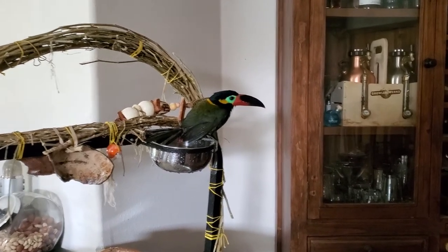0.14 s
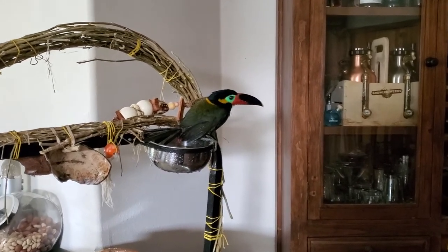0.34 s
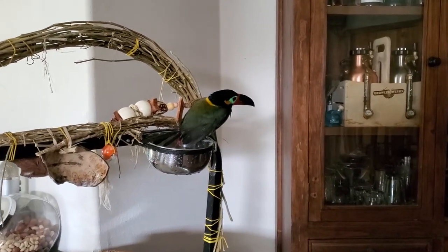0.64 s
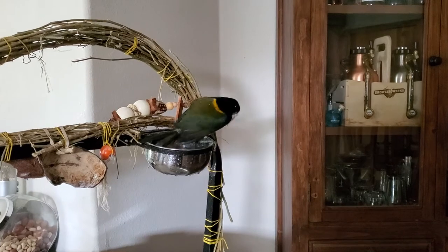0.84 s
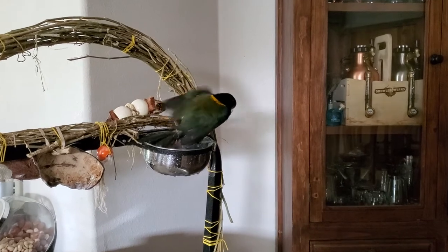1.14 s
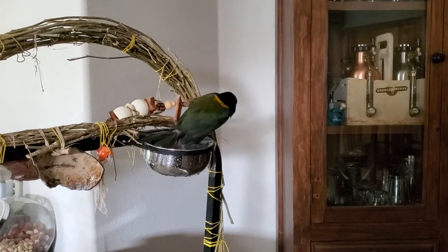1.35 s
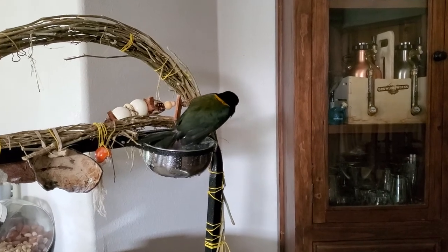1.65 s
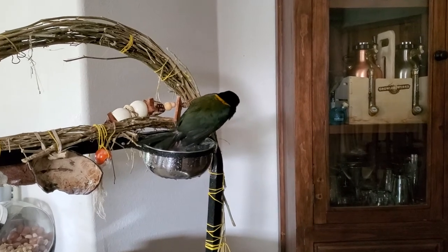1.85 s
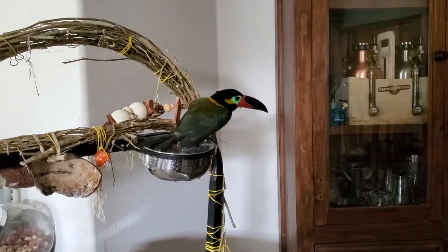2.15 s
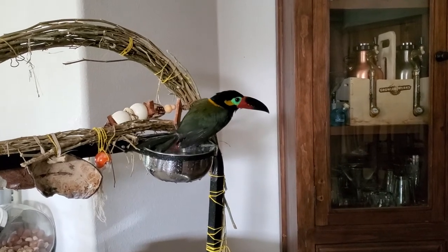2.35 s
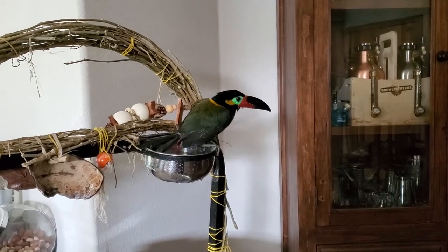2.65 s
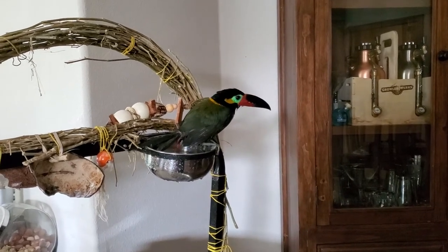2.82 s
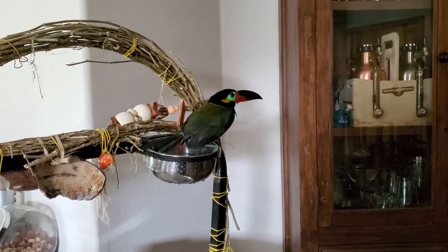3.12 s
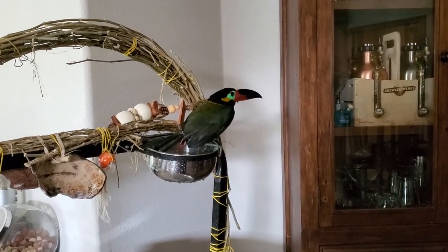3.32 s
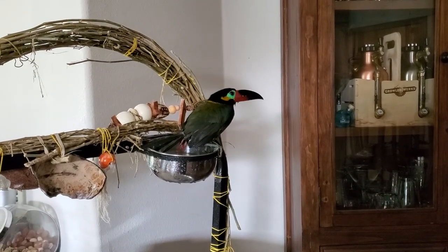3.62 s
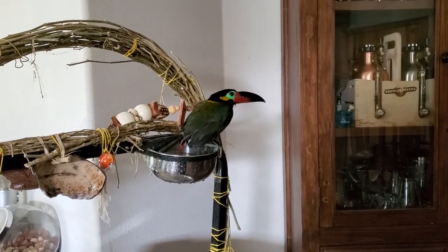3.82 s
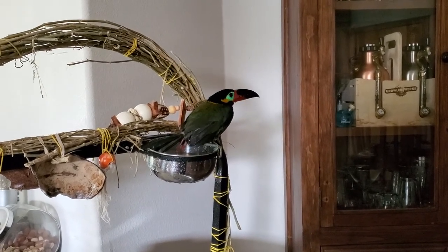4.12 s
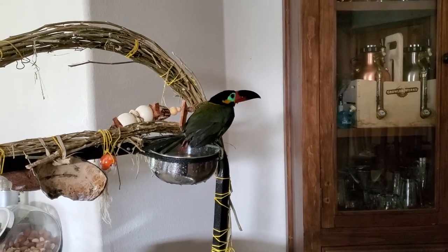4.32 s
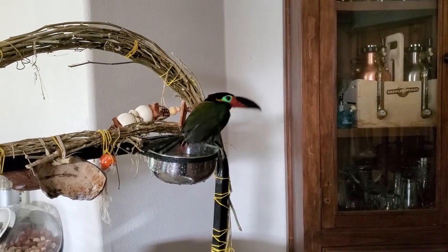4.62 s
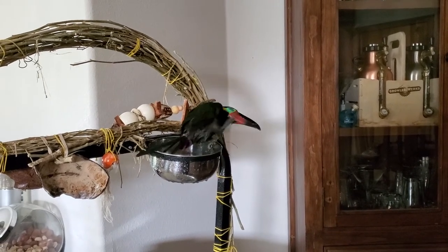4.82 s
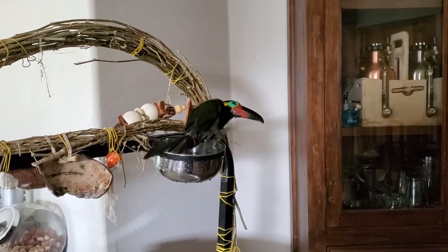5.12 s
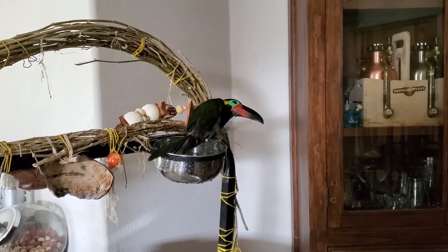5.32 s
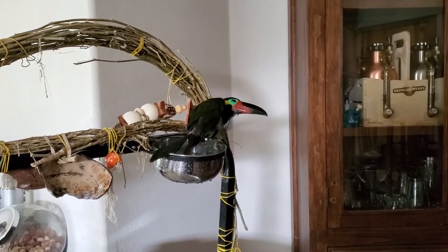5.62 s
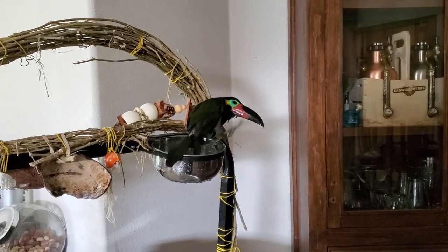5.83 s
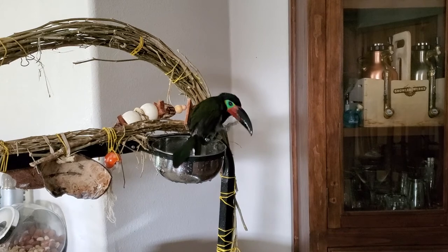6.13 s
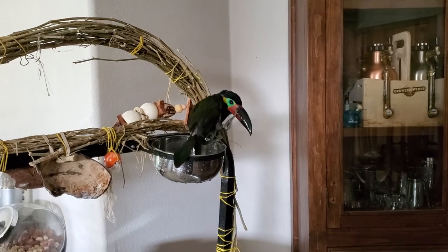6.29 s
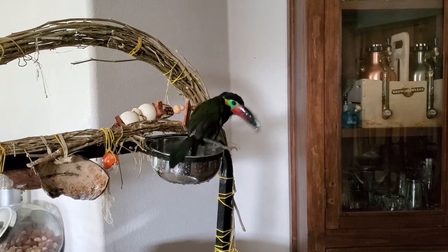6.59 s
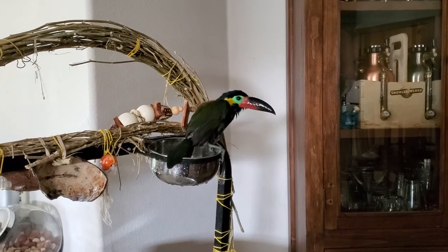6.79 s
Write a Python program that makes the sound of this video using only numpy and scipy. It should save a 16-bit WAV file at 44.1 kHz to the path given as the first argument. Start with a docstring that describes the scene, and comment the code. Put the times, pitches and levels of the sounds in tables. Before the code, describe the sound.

A small bird bathes in a metal water bowl indoors. It shivers its damp feathers with a high rustle, and quick wingbeats tap the bowl. Three short hissing head flicks follow, spaced apart. Then a wing slaps the water in a bright, bubbly splash, drops patter back, and the feathers shiver again. It is heard from a few steps away in a slightly echoing room with a faint low hum.

```python
"""A toucanet bathes at a steel water bowl in a bare-walled room with a low hum.
It shivers its damp feathers; runs of quick wingbeats tap the bowl. Three hissing head flicks
follow, a soft scrape among them. At 5 s a wing slaps the water: spray, an air pocket and bubbles
sound, and narrow tones linger. Drops patter back, the feathers shiver again, and a faint squeak
and two flicks end the bath. The room reverberates throughout."""
import sys
import numpy as np
from scipy import signal
from scipy.fft import rfft, irfft
from scipy.io import wavfile
from scipy.ndimage import uniform_filter1d

SR = 44100
rng = np.random.default_rng(int(sys.argv[2]) if len(sys.argv) > 2 else 0)


def master_out(mix):
    """Clip the mix to full scale and print it as 16-bit PCM to the path in sys.argv[1]."""
    frames = np.transpose(np.atleast_2d(mix))
    ceiling = np.clip(frames, -1, 1)
    pcm = np.round(ceiling * 32767).astype(np.int16)
    wavfile.write(sys.argv[1], SR, pcm)


N = 306740

# Table levels are relative. Source spectra: f/Hz, level/dB
SPRAY_SPECTRUM = [(400, -47.5), (900, -32.5), (1330, -13.5), (1750, -13), (2050, -8.5), (2550, -8),
                  (3000, -4), (3700, -6.5), (4950, 1), (5800, -5.5), (8300, -11.5), (11500, -15.5),
                  (13800, -22), (16000, -25)]
RUSTLE_SPECTRUM = [(1500, -22.5), (4000, -13), (6500, -5), (8800, 1), (11000, -1), (14000, 4), (16000, 0.5)]
SWISH_SPECTRUM = [(500, -8.5), (1100, -21), (1600, -0.5), (2500, -7), (3600, -5), (5000, -7), (7000, -4),
                  (16000, -11)]
TAP_SPECTRUM = [(400, -11.5), (1000, -0.5), (1700, 7.5), (2500, -4), (3700, 7), (5200, -3), (7000, -1.5),
                (9200, 2.5), (12000, -4.5), (16000, -4)]
HISS_SPECTRUM = [(1500, -38.5), (3400, -24), (4400, -22.5), (5500, -26.5), (6300, -12.5), (7000, -13.5),
                 (7800, -3.5), (8500, 3.5), (9200, -4.5), (10500, -3.5), (12300, 1.5), (14000, -2),
                 (15500, 3), (16500, -18.5)]
AIR_SPECTRUM = [(20, -18), (41, 0), (60, 0.5), (86, -13), (130, -12), (200, -10), (290, -14.5),
                (500, -19.5), (800, -22), (1500, -25.5), (2600, -34.5), (6000, -46), (10000, -47.5),
                (12500, -42), (16000, -40.5)]
# Bubbles driven under by the wing: t/s, f/Hz, level/dB
BUBBLES = [(4.966, 522, -49), (4.982, 655, -38), (4.995, 737, -34), (5.03, 1070, -31), (5.04, 1402, -21.5)]
# Narrow ringing tones of the splash: f/Hz, level/dB
RINGING_TONES = [(1416, -57.5), (1610, -53), (2046, -39.5), (2239, -43.5), (2379, -47), (2772, -34),
                 (2810, -36.5), (2877, -37), (3105, -43.5), (3217, -42), (3900, -46), (4149, -41.5),
                 (4413, -40), (4737, -42.5), (4800, -39), (4841, -35), (4914, -38.5), (5011, -39),
                 (5083, -43.5), (5228, -44), (5545, -42.5), (5889, -43), (6207, -40), (6912, -44.5),
                 (7063, -45.5), (7418, -45.5)]
# Feather shivers: t/s, length/s, rustle/dB, swish/dB, tiring/(dB/s)
SHIVER_BOUTS = [(0.83, 0.18, -40.5, -60.5, 32), (0.892, 0.49, -53, -55.5, 3), (1.418, 0.65, -53.5, -61, 0),
                (5.283, 0.53, -51.5, -59.5, 26), (5.946, 0.15, -51.5, -67, 2),
                (6.136, 0.26, -46, -59.5, 32)]
# Wingbeat runs: first t/s, last t/s, count, level/dB, low cut/Hz
WINGBEAT_RUNS = [(1.432, 1.645, 5, -41.5, 2300), (1.7028, 2.035, 7, -37, 1440),
                 (5.358, 5.763, 9, -40, 2820), (5.944, 6.419, 9, -41.5, 2930)]
# Wet feathers and drops hitting the bowl: t/s, level/dB, low cut/Hz, treble/(dB/octave)
HARD_TAPS = [(.905, -42, 2870, -4.5), (1.313, -39.5, 2500, -4), (1.431, -36.5, 1390, 2.5),
             (2.059, -36, 3000, 8.5), (4.8273, -27, 3320, 8), (4.879, -37, 2800, 0.5),
             (4.888, -28.5, 2340, 0), (4.933, -34, 3000, 9), (4.943, -30, 1840, -4),
             (5.712, -31, 2510, -10.5), (5.772, -35.5, 1500, 0), (5.8232, -44.5, 2980, 5),
             (5.8882, -51, 3200, -4.5), (5.95, -39.5, 3490, 7), (6.011, -39.5, 1500, -6),
             (6.06, -39.5, 3040, -5), (6.1191, -30.5, 2930, -7), (6.144, -28, 2680, 17),
             (6.1833, -31.5, 1184, 1.5)]
# Sloshes, soft shuffles and a faint squeak: t/s, level/dB, centre f/Hz, half-width/octaves, decay/s
SOFT_NOISES = [(.896, -57.5, 1660, 0.38, 0.014), (0.957, -47.5, 4000, 0.61, 0.081),
               (.981, -27, 3950, 0.61, 0.0034), (1.1156, -28.5, 2740, 0.6, 0.0043),
               (1.225, -38, 3300, 0.25, 0.0043), (3.323, -55.5, 1570, 0.3, 0.028),
               (3.324, -54.5, 606, 0.47, 0.033), (3.331, -60, 8000, 2.5, .029),
               (3.449, -55, 11100, 1.05, 0.013), (6.672, -64, 2690, .14, 0.037)]
# Head flicks: t/s, level/dB, decay/s, bill resonance/dB
HEAD_FLICKS = [(2.2485, -42, 0.0056, -26), (3.1408, -37.5, 0.0054, -56), (4.1074, -22.5, 0.0054, -29.5),
               (6.743, -45, 0.015, -11), (6.766, -42, 0.0061, -10)]
# Resonances of the hiss and the hollow bill: f/Hz, width/Hz, level/dB
WHISTLE_MODES = [(8490, 65, -3), (10200, 27, 8), (9900, 76, -7), (11440, 35, -3), (12400, 85, -9),
                 (13300, 73, 12), (13900, 71, -15), (14900, 110, -15.5)]
BILL_MODES = [(3150, 320, -17), (4380, 340, 0), (6400, 520, 2)]
# Stereo balance: f/Hz, left minus right/dB
SPLASH_PAN = [(700, -2.5), (1300, -1.5), (2200, 1.5), (2900, 4), (4400, 0), (7500, -1), (10000, 2.5),
              (15000, 4.5)]
FEATHER_PAN = [(550, -2), (1650, 1), (5000, 0), (15000, 2.5)]
FLICK_PAN = [(4000, 1), (8000, 1.5), (16000, 3.5)]
# Room decay: f/Hz, T60/s
REVERB_T60 = [(300, 0.43), (1500, .55), (3000, 0.57), (5000, 0.56), (8400, 0.42), (12000, 0.34),
              (16000, 0.14)]
# Room noise coherence: f/Hz, left-right correlation
AIR_COHERENCE = [(60, 0.95), (130, 0.92), (290, 0.86), (640, 0.35), (1410, -0.24), (3100, 0.15),
                 (6820, 0.079), (15000, -0.02)]
# Hum bands: f/Hz, width/Hz, level/dB
HUM_BANDS = [(59.4, 14, -64.5), (117.8, 4, -69.5), (190, 11, -73), (232.9, 6, -75), (287.4, 5.4, -75.5)]

STROKE_START_S = 4.958


def splash(spray_lag_s=.004, open_hz=2230, shut_hz=2870, shut_after_s=.052, glide_s=.009):
    """The wing throws up spray and drives air under; the pocket shrinks, so its pitch climbs."""
    force = wing_stroke()
    age_s = np.maximum(np.arange(N) / SR - STROKE_START_S, 0)
    slaps = grains(per_s=350, spread_db=2)
    drops = unit_rms(grains(per_s=6000, spread_db=3.5) + .9 * slaps)
    thrown = np.interp(np.arange(N) - spray_lag_s * SR, np.arange(N), force)
    spray = colour(thrown * drops, lambda hz: lookup(SPRAY_SPECTRUM, hz))
    shut = .5 + .5 * np.tanh((age_s - shut_after_s) / glide_s)
    pocket_hz = open_hz + (shut_hz - open_hz) * shut
    pocket = resonate(grains(per_s=1200, spread_db=.5), pocket_hz, width_hz=410)
    pocket = unit_rms(resonate(pocket, pocket_hz, width_hz=500))
    out = gain(-1) * spray + force * gain(-4.5 - 70.5 * age_s) * pocket
    for start_s, hz, db in BUBBLES:
        add(out, start_s, gain(db) * bubble(hz))
    return out


def wing_stroke(build_s=.04, hold_s=.056, peak_db=-14, build_db_per_s=480):
    """Wing force on the water: builds as it digs in, holds, dies away."""
    to_peak_s = np.clip(STROKE_START_S + build_s - np.arange(N) / SR, 0, build_s)
    contact = envelope(STROKE_START_S, build_s + hold_s, rise_s=.01, fall_db_per_s=165.5)
    return gain(peak_db - build_db_per_s * to_peak_s) * contact


def bubble(hz, decay_s=.007, rise_s=.00047):
    """A ringing bubble; pitch climbs as it nears the surface."""
    t = np.arange(SR // 8) / SR
    return np.sin(2 * np.pi * hz * t * (1 + 3 * t)) * np.exp(-t / decay_s) * (1 - np.exp(-t / rise_s))


def splash_ringing(t60_s=.42, drift_step_s=.03, drift_rad=1.3):
    """Narrow tones colour the splash and linger in the room, drifting separately per ear."""
    retained = np.exp(-np.log(1e6) / (t60_s * SR))
    energy = signal.lfilter([1 - retained], [1, -retained], wing_stroke() ** 2)
    t = np.arange(N) / SR
    knots_s = np.arange(0, N / SR, drift_step_s)
    out = np.zeros((2, N))
    for ear in out:
        for hz, db in RINGING_TONES:
            drift = np.interp(t, knots_s, rng.standard_normal(len(knots_s)))
            ear += gain(db) * np.sin(2 * np.pi * (hz * t + rng.random()) + drift_rad * drift)
    return np.sqrt(energy) * unit_rms(out)


def feathers(uneven_db=2.5, beat_db=7, beat_decay_s=.012):
    """Barbs rub and crackle, water in the plumage swishes lower; both swell on each wingbeat."""
    t = np.arange(N) / SR
    rubbing, swishing, beating = np.zeros((3, N))
    for start_s, _, _ in wingbeats():
        add(beating, start_s, np.exp(-t[:SR // 4] / beat_decay_s))
    uneven = unit_rms(uniform_filter1d(uniform_filter1d(rng.standard_normal(N), size=500), size=500))
    strokes = gain(uneven_db * uneven + beat_db * beating)
    for start_s, length_s, rustle_db, swish_db, tiring_db_per_s in SHIVER_BOUTS:
        effort = strokes * envelope(start_s, length_s, rise_s=.013, fall_db_per_s=230)
        effort *= gain(-tiring_db_per_s * np.clip(t - start_s, 0, length_s))
        rubbing += gain(rustle_db) * effort
        swishing += gain(swish_db) * effort
    barbs = grains(per_s=9000, spread_db=3.5)
    crackles = .45 * grains(per_s=140, spread_db=3)
    water = grains(per_s=1700, spread_db=3.5)
    rustle = colour(rubbing * (barbs + crackles), lambda hz: lookup(RUSTLE_SPECTRUM, hz))
    swish = colour(swishing * water, lambda hz: lookup(SWISH_SPECTRUM, hz))
    return gain(-7.5) * rustle + gain(-3) * swish


def wingbeats(ends_db=-2):
    """Evenly spaced beats, strongest mid-run: t/s, level/dB, low cut/Hz."""
    return [(first_s + (last_s - first_s) * part, db + ends_db * (2 * part - 1) ** 2, low_hz)
            for first_s, last_s, count, db, low_hz in WINGBEAT_RUNS
            for part in np.linspace(0, 1, round(count))]


def taps(scatter_db=2, scatter_octaves=.3, upstroke_s=.019, upstroke_db=-6):
    """Wet wings touch the bowl twice a beat; single taps accent some beats or fall on their own."""
    out = np.zeros(N)
    for start_s, db, low_hz in wingbeats():
        down, up, late = rng.standard_normal(3)
        down_hz = low_hz * 2 ** (-scatter_octaves * down)
        add(out, start_s, tap(db - scatter_db * down, down_hz, treble_db_per_octave=-2))
        return_s = start_s + upstroke_s * (1 + .13 * late)
        add(out, return_s, tap(db + upstroke_db - scatter_db * up, low_hz, treble_db_per_octave=2.5))
    for start_s, *settings in HARD_TAPS:
        add(out, start_s, tap(*settings))
    return out


def tap(db, low_hz, treble_db_per_octave):
    """One hit on the bowl: tick, spatter, short scratch."""
    def spectrum_db(hz):
        treble_db = treble_db_per_octave * np.clip(np.log2((hz + 1) / 4000), 0, 2)
        return lookup(TAP_SPECTRUM, hz) + low_cut_db(hz, low_hz) + treble_db

    spatter = gain(-2) * burst(decay_s=.001, rise_s=.0001)
    scratch = gain(-16.5) * burst(decay_s=.0069, rise_s=.0049)
    hit = spatter + scratch
    hit[0] += 3  # tick
    return gain(db + 1) * colour(hit, spectrum_db)


def flicks():
    """Head flicks: spits of hiss with thin whistles, coloured by the hollow bill."""
    puffs, bill_drive = np.zeros((2, N))
    for start_s, db, decay_s, bill_db in HEAD_FLICKS:
        puff = gain(db) * burst(decay_s, rise_s=.00059)
        add(puffs, start_s, puff)
        add(bill_drive, start_s, gain(bill_db) * puff)
    hiss = colour(puffs, lambda hz: lookup(HISS_SPECTRUM, hz))
    bill = ring(colour(bill_drive, lambda hz: low_cut_db(hz, 3500)), BILL_MODES)
    return gain(1.5) * hiss + gain(-9.5) * ring(hiss, WHISTLE_MODES) + bill


def soft_noises():
    """Sloshes, soft shuffles and a faint squeak, one noise band each."""
    out = np.zeros(N)
    for start_s, db, centre_hz, octaves, decay_s in SOFT_NOISES:
        puff = burst(decay_s, rise_s=.0022)
        band = colour(puff, lambda hz: -14 * np.log10(1 + (np.log2((hz + 1) / centre_hz) / octaves) ** 4))
        add(out, start_s, gain(db) * band)
    return out


def room(x, tail_db, early_db, right_lag_s=0, echoes_per_s=5000):
    """Direct sound, wall and cabinet echoes, then a tail that dies sooner in the treble."""
    t = np.arange(SR) / SR
    echoes = rng.choice([-1., 1.], (2, SR)) * (rng.random((2, SR)) < echoes_per_s / SR)
    early = echoes * (t > .0002) * np.exp(-t / .0062)
    hz, frame_s, spectra = signal.stft(echoes * np.clip((t - .004) / .009, 0, 1), SR, nperseg=256)
    decay = gain(-60 * frame_s / lookup(REVERB_T60, hz)[:, None])
    tail = signal.istft(spectra * decay, SR, nperseg=256)[1][:, :SR]
    response = (gain(tail_db) * unit_rms(tail) + gain(early_db) * unit_rms(early)) / np.sqrt(SR)
    response[[0, 1], [0, round(right_lag_s * SR)]] += 1  # direct path
    return signal.fftconvolve(x[None], response / np.linalg.norm(response[0]), axes=1)[:, :N]


def air():
    """Steady room noise, alike in both ears in the bass."""
    hz = np.fft.rfftfreq(N, 1 / SR)
    left, independent = rfft(rng.standard_normal((2, N)))
    coherence = lookup(AIR_COHERENCE, hz)
    right = coherence * left + np.sqrt(1 - coherence ** 2) * independent
    return unit_rms(irfft(np.array([left, right]) * gain(lookup(AIR_SPECTRUM, hz)), N))


def hum():
    """Low wavering hum: narrow noise bands."""
    hz = np.fft.rfftfreq(N, 1 / SR)
    out = np.zeros(N)
    for centre_hz, width_hz, db in HUM_BANDS:
        band = np.exp(-((hz - centre_hz) / width_hz) ** 2)
        out += gain(db) * unit_rms(irfft(rfft(rng.standard_normal(N)) * band, N))
    return out


def gain(db):
    """dB to amplitude factor."""
    return 10 ** (np.asarray(db) / 20)


def unit_rms(x):
    """Scale to rms 1."""
    return x / np.sqrt(np.mean(x ** 2) + 1e-20)


def lookup(table, hz):
    """Interpolate on a log-frequency axis."""
    table_hz, values = np.transpose(table)
    return np.interp(np.log(hz + 1), np.log(table_hz + 1), values)


def add(mix, start_s, sound):
    """Mix in at start_s."""
    part = mix[round(start_s * SR):][:len(sound)]
    part += sound[:len(part)]


def low_cut_db(hz, corner_hz):
    """Fourth-order high-pass curve."""
    return -10 * np.log10(1 + (corner_hz / (hz + 1)) ** 8)


def colour(x, spectrum_db):
    """Minimum-phase filter of unit energy."""
    db = spectrum_db(abs(np.fft.fftfreq(2048, 1 / SR)))
    log_gain = np.log(gain(np.maximum(db - db.max(), -80)))
    kernel = np.fft.ifft(np.exp(np.conj(signal.hilbert(log_gain)))).real
    return signal.fftconvolve(x, kernel / np.linalg.norm(kernel))[:len(x)]


def resonate(x, hz, width_hz):
    """Unit-gain resonance, steady or gliding."""
    carrier = np.exp(2j * np.pi * np.cumsum(hz * np.ones(len(x))) / SR)
    pole = np.exp(-np.pi * width_hz / SR)
    return 2 * (carrier * signal.lfilter([1 - pole], [1, -pole], x / carrier + 1e-18)).real


def ring(x, modes):
    """Power-preserving resonator bank."""
    return x.std() * unit_rms(sum(gain(db) * resonate(x, hz, width_hz) for hz, width_hz, db in modes))


def grains(per_s, spread_db):
    """Random clicks, most small, a few large."""
    size = gain(spread_db * np.minimum(rng.exponential(1, N), 4))
    return unit_rms(size * rng.choice([-1, 1], N) * (rng.random(N) < per_s / SR))


def envelope(start_s, length_s, rise_s, fall_db_per_s):
    """Smooth rise, hold to length_s, exponential fall."""
    age_s = np.arange(N) / SR - start_s
    rise = np.sin(np.pi / 2 * np.clip(age_s / rise_s, 0, 1)) ** 2
    return rise * gain(-fall_db_per_s * np.maximum(age_s - length_s, 0))


def burst(decay_s, rise_s):
    """Noise puff: quick rise, exponential fall."""
    t = np.arange(8192) / SR
    shape = np.exp(-t / decay_s) * (1 - np.exp(-t / rise_s))
    return unit_rms(shape * rng.standard_normal(len(t))) * np.sqrt(np.mean(shape ** 2))


def pan(x, balance):
    """Left-right tilt per frequency."""
    db = lookup(balance, np.fft.rfftfreq(N + SR, 1 / SR))
    return irfft(rfft(x, N + SR) * gain([db / 2, -db / 2]), N + SR)[:, :N]


def scene():
    """Bird slightly left, a few steps away."""
    water = room(splash(), tail_db=-1, early_db=5, right_lag_s=.00043) * gain(1.5)
    water += splash_ringing() * gain(-4.5)
    plumage = room(feathers() + soft_noises(), tail_db=5, early_db=7) * gain(1)
    ticks = room(taps(), tail_db=-4, early_db=.5) * gain(1.5)
    head = room(flicks(), tail_db=6, early_db=9, right_lag_s=.0004) * gain(4.5)
    background = (air() * gain(-58.5) + hum()) * gain([[-.5], [.5]])
    return pan(water, SPLASH_PAN) + pan(plumage + ticks, FEATHER_PAN) + pan(head, FLICK_PAN) + background


def record(dry):
    """Clip at full scale, then low-pass."""
    cutoff_hz = 15950
    kernel = signal.firwin(255, cutoff_hz, window=("kaiser", 9), fs=SR)
    return signal.oaconvolve(np.clip(dry, -1, 1), kernel[None], "same")


dry = scene()
out = record(dry)
master_out(out)
```